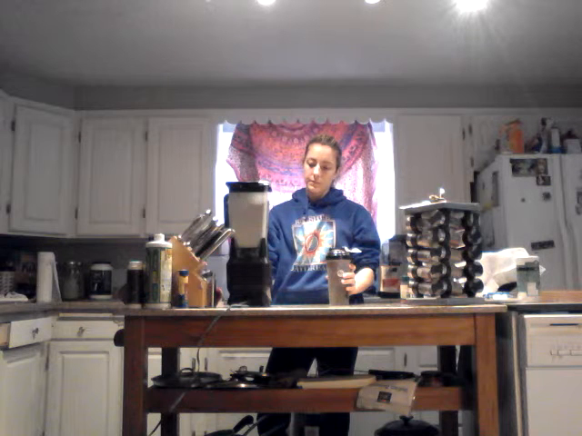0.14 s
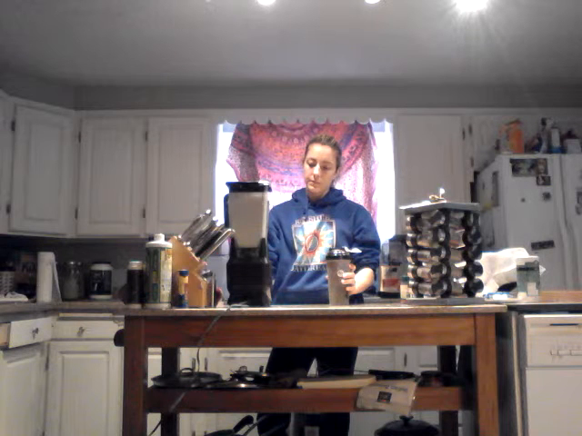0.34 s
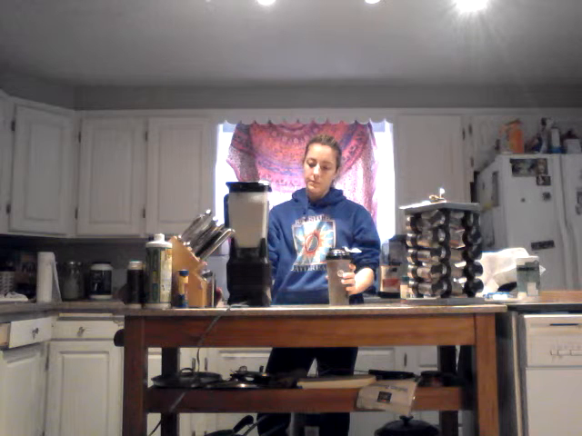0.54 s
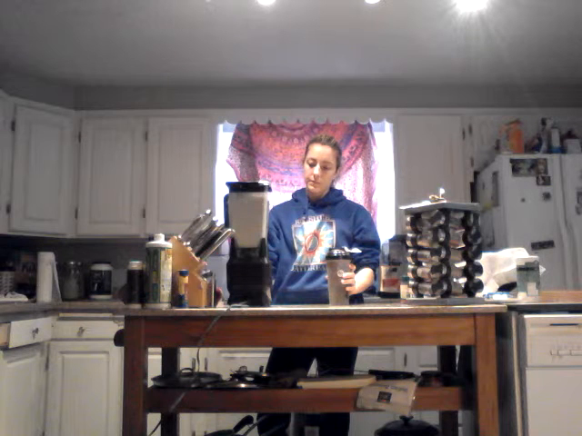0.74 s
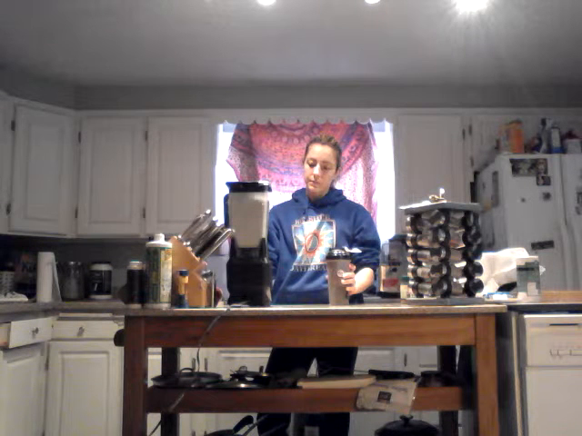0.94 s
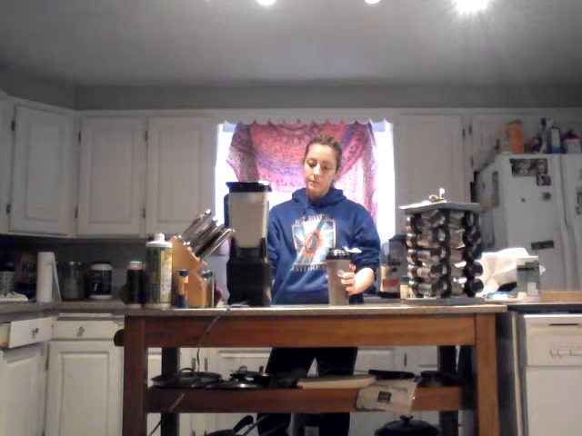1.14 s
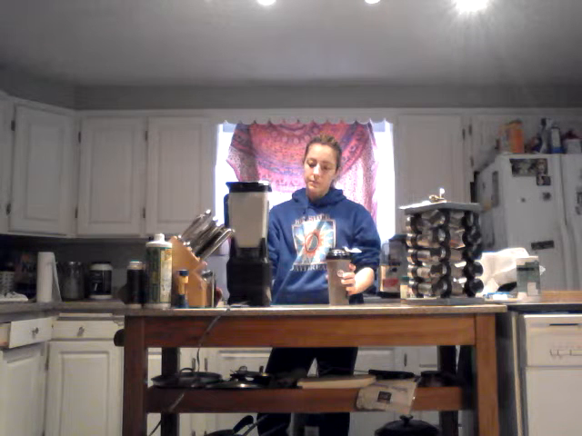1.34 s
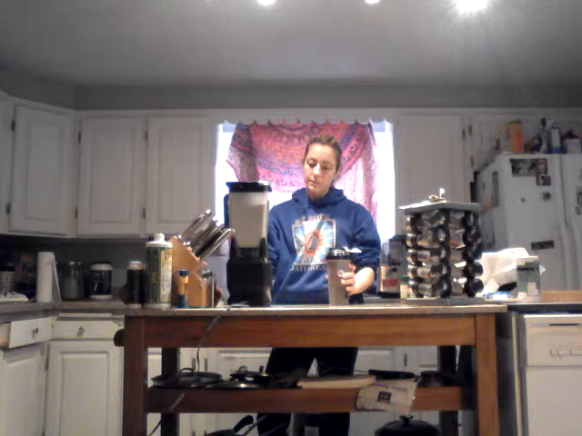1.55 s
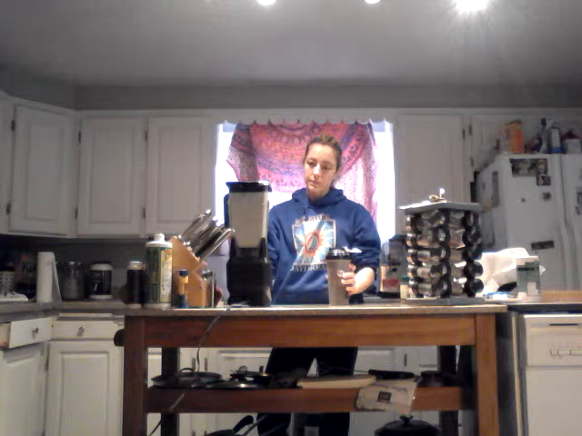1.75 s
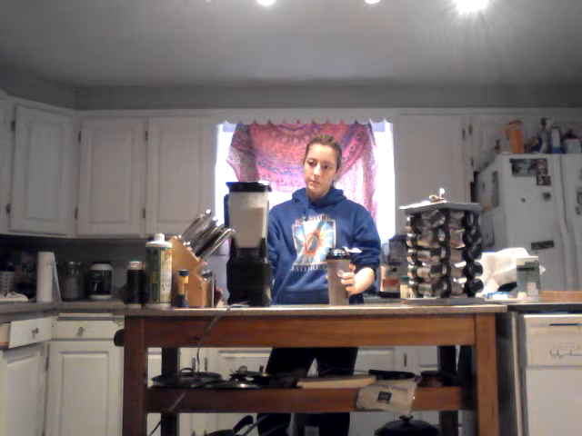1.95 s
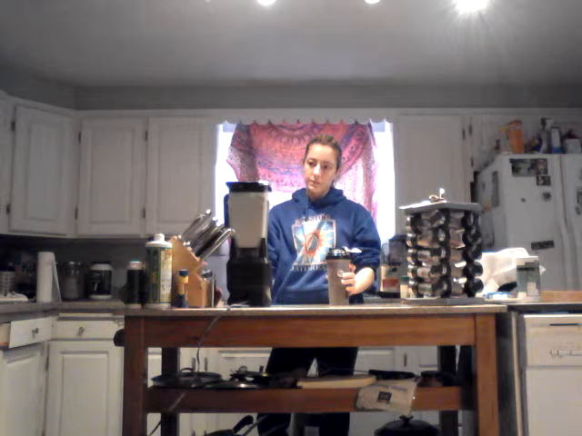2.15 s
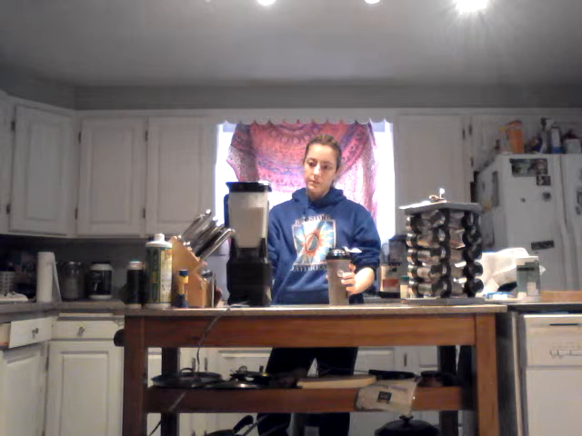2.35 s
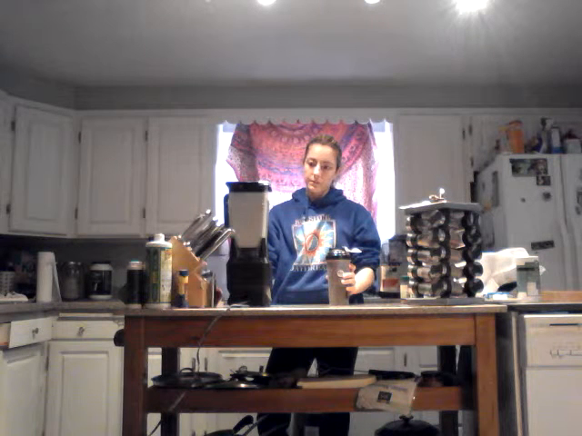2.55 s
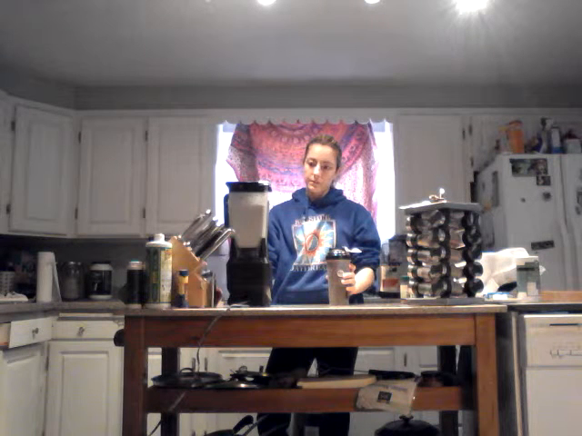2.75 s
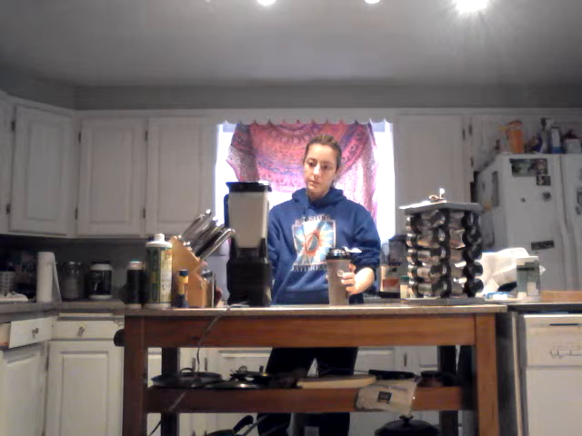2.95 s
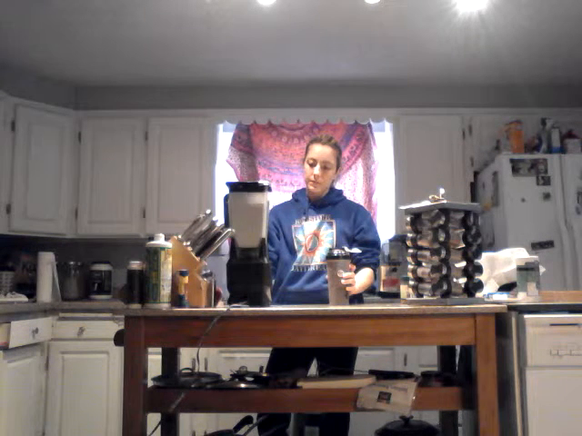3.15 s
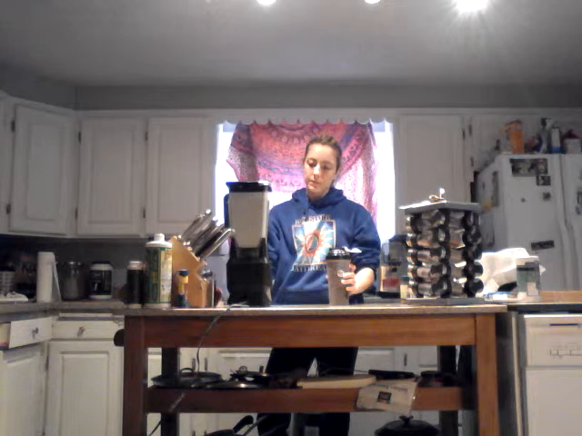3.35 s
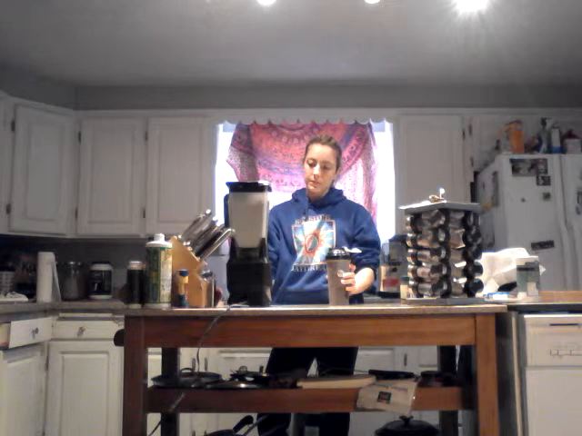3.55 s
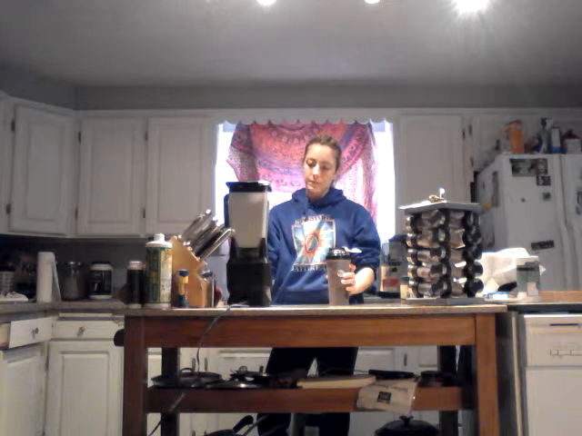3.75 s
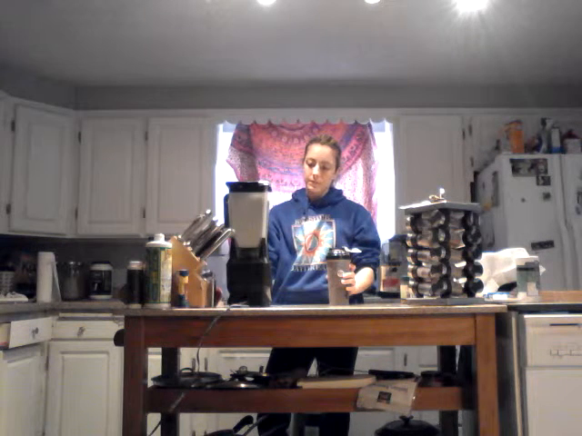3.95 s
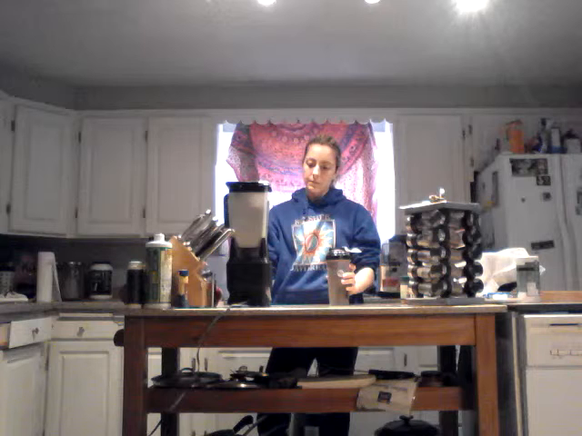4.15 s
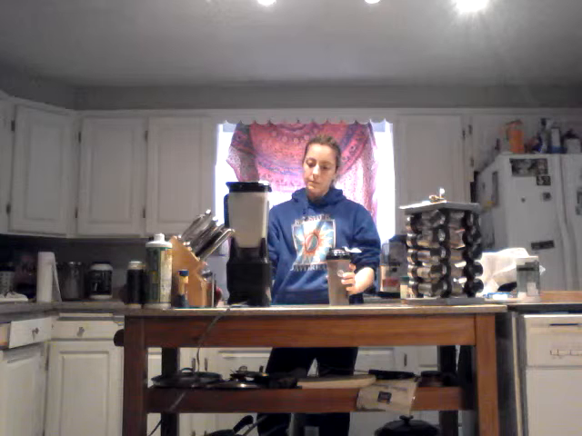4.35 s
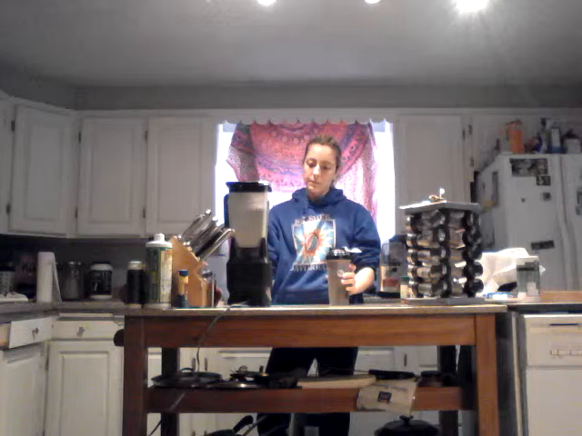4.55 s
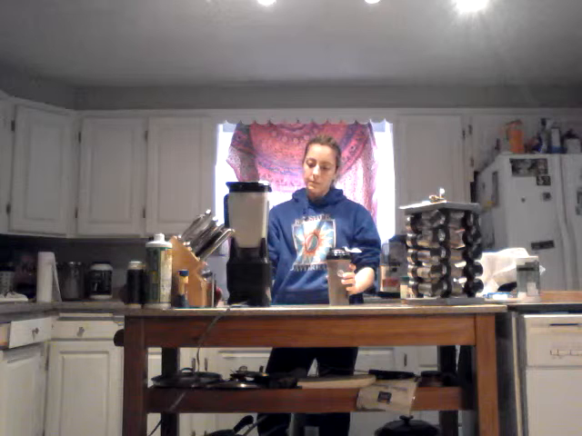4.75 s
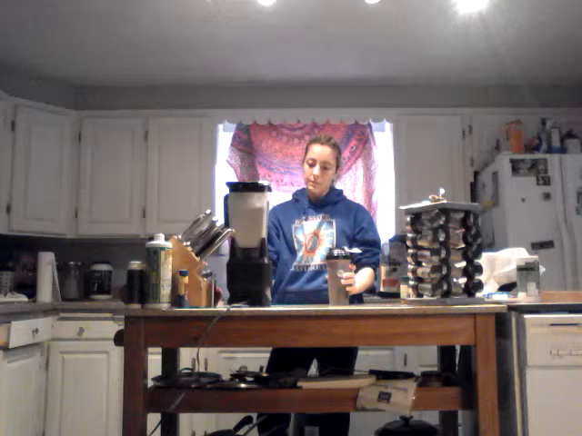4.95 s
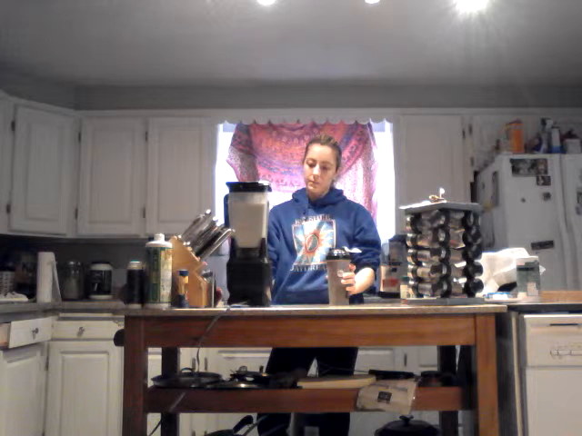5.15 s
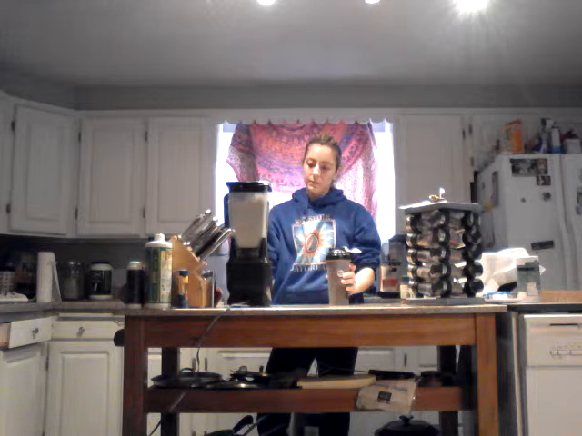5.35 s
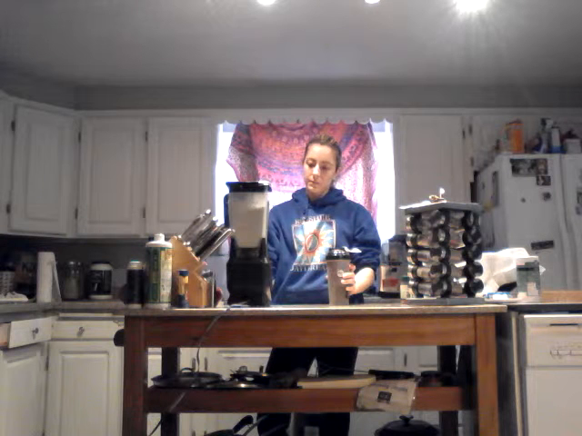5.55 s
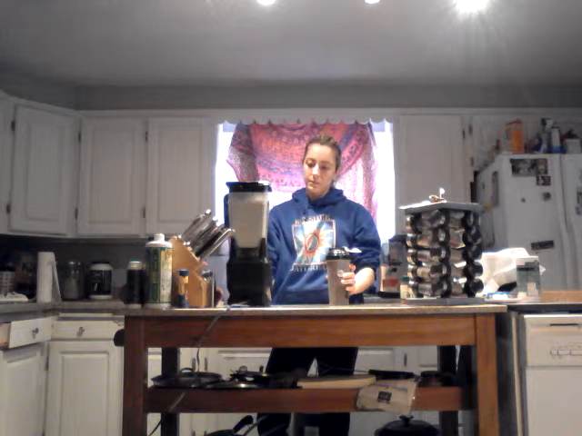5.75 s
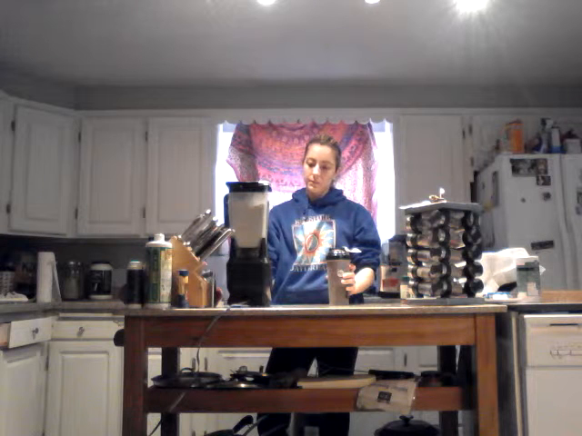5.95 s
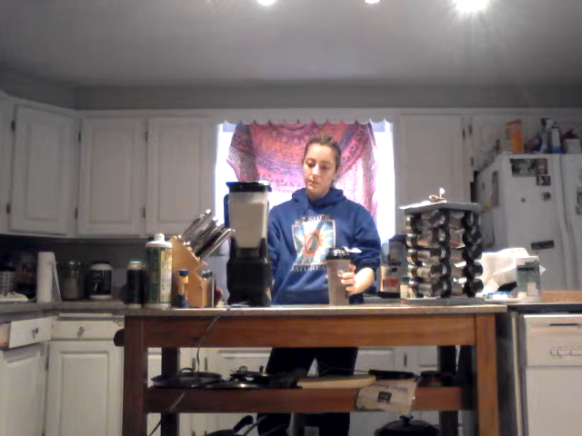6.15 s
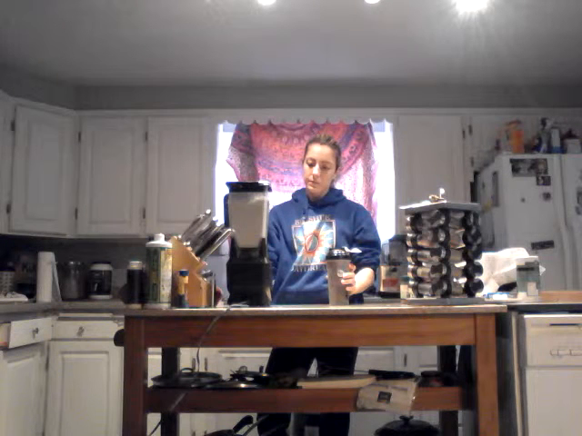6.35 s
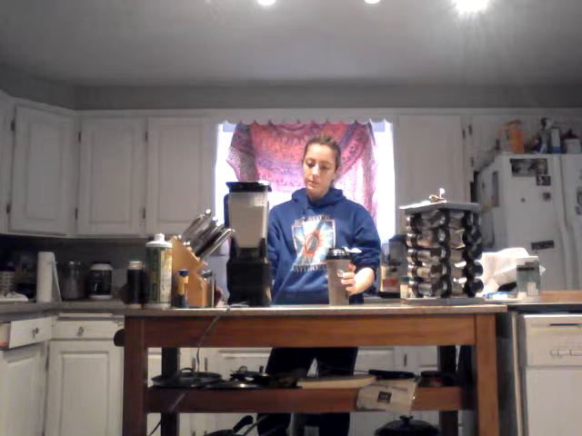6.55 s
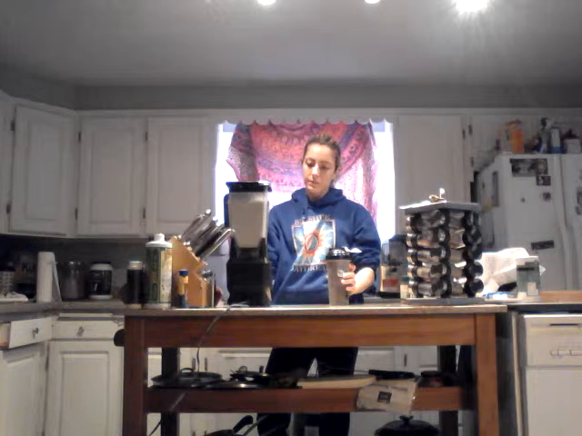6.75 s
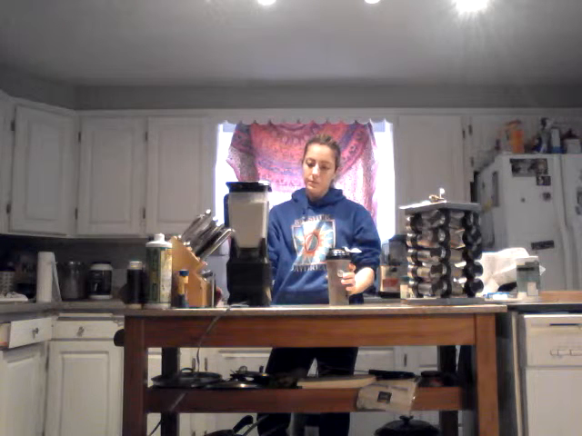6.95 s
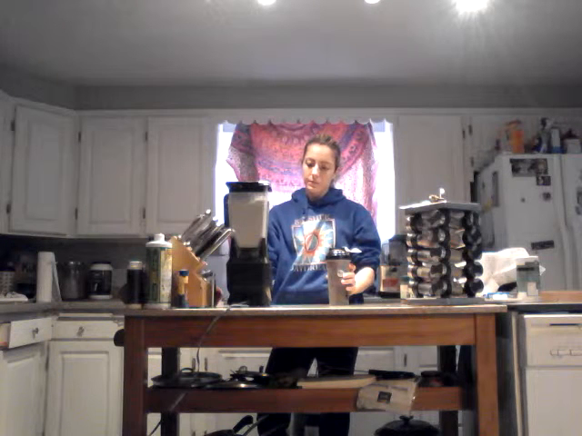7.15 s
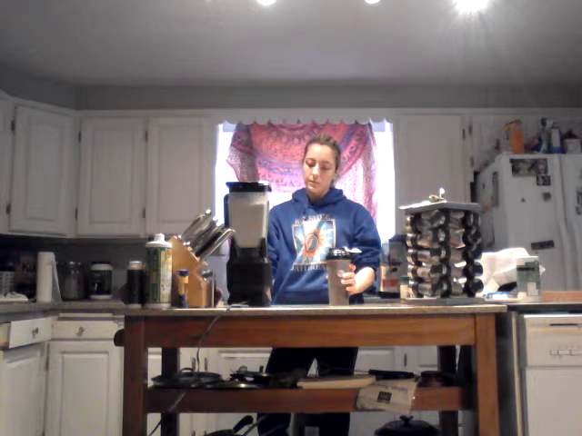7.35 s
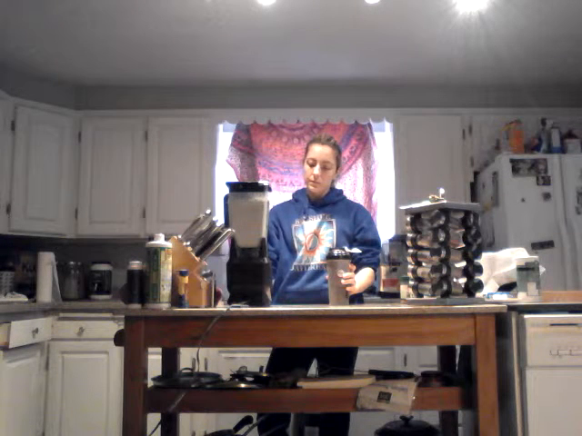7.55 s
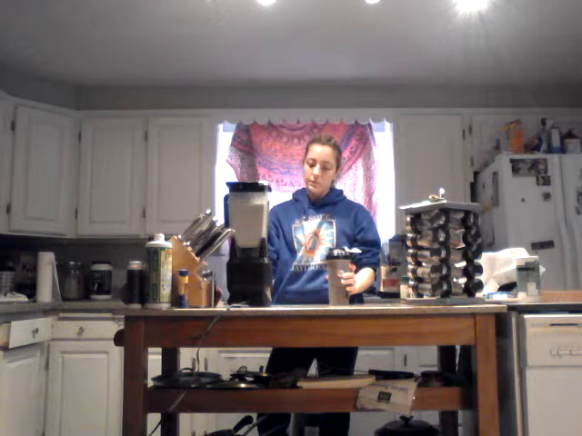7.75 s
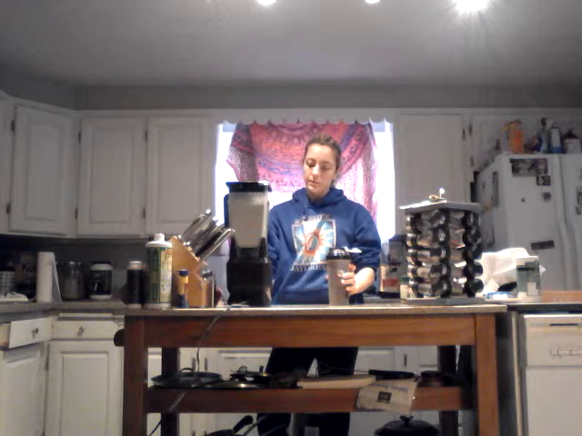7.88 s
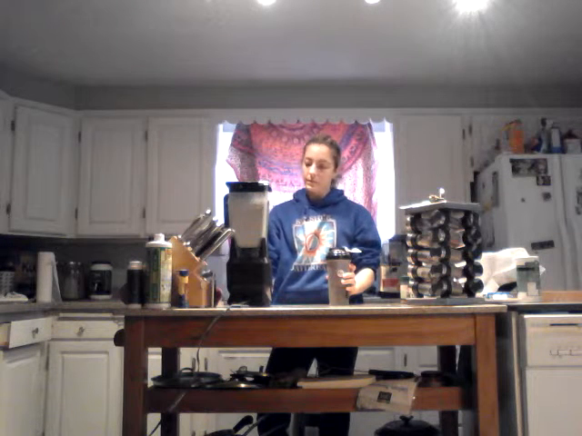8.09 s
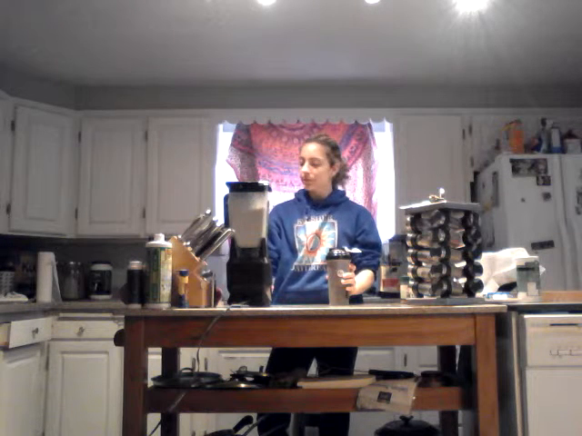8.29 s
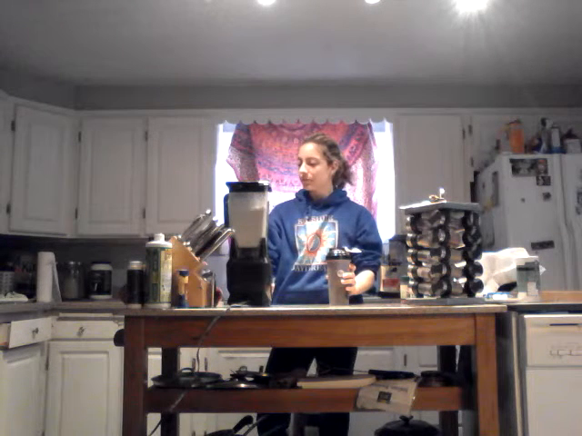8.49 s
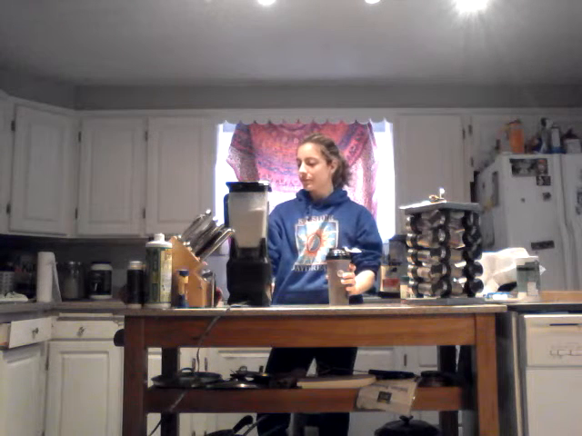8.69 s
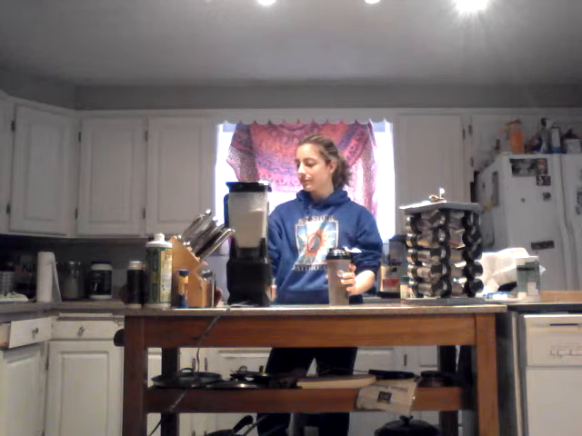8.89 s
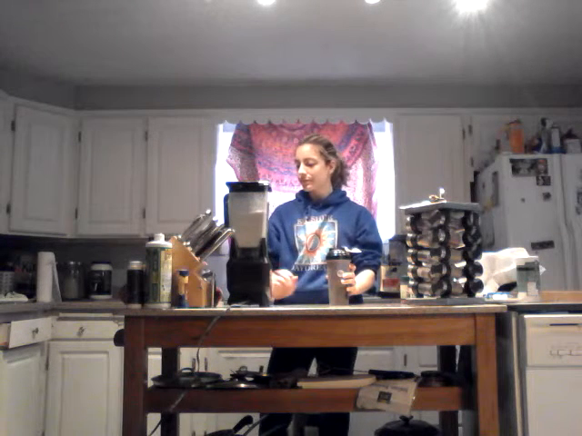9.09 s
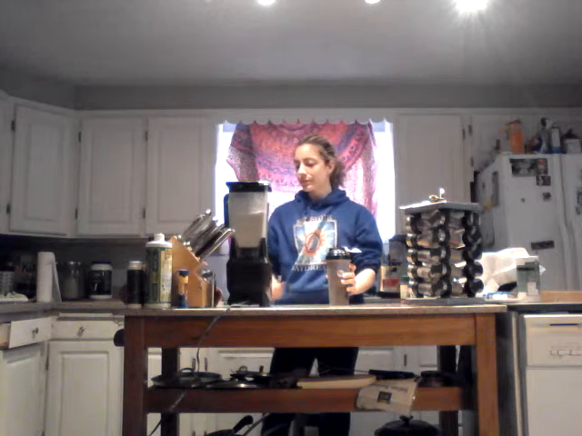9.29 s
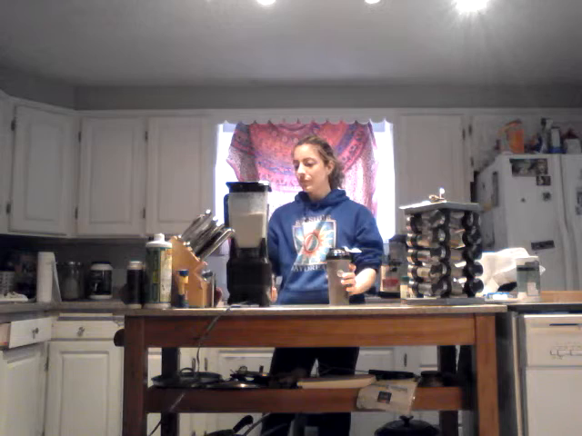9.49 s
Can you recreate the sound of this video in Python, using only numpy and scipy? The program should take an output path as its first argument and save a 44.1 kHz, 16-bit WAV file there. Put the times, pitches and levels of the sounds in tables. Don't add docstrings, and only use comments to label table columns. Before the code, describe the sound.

A kitchen blender roars and whines steadily, bogs down and surges in pitch under load, then switches off and coasts down to faint hiss.

```python
import sys
import numpy as np
from scipy import signal
from scipy.fft import rfft, irfft, next_fast_len
from scipy.io import wavfile
from scipy.ndimage import uniform_filter1d, map_coordinates

SR = 44100
rng = np.random.default_rng(int(sys.argv[2]) if len(sys.argv) > 2 else 0)


def gain_from_db(level_db):
    decades = np.asarray(level_db, float) / 20
    return 10 ** decades


def digitize_waveform(pressure):
    field = np.atleast_2d(pressure).T
    bounded = np.clip(field, -1, 1)
    quanta = np.round(bounded * 32767).astype(np.int16)
    wavfile.write(sys.argv[1], SR, quanta)


N = 426006
FRAME = 1024


def along(points, hz):
    f, db = np.transpose(points)
    return np.interp(np.log(hz + 1), np.log(f + 1), db)


def wobble(t, rate):
    knots = rng.standard_normal(int(t[-1] * rate) + 4)
    return map_coordinates(knots, [t * rate])


def hump(hz, centre_hz, spread):
    return np.exp(-0.5 * (np.log((hz + 1) / centre_hz) / spread) ** 2)


def unit(power):
    return power / power.sum(axis=0)


def ramp(t, start_s, rise_s):
    return np.clip((t - start_s) / rise_s, 0, 1)


# (unsteadiness [share of pitch], whine [dB], 2nd multiple [dB], 3rd multiple [dB],
# blade roar [dB], thrum [dB])
FREE = (0.054, -20, 6, -24, -1, -15)
LOADED = (0.07, 0, -0.5, -16, 0.05, -17)
STOPPED = (0.05, 11.5, -2, 0, -25, -16.5)
FREE_HZ, LOADED_HZ, LOAD_S, LOAD_RISE_S = 1914, 1800, 3.8, 0.15
BOG_END_S, BOG_HZ, BOG_SECOND_DB, BOG_THIRD_DB, BOG_JAR_DB = 4.45, -40, 2, 9, -5
HUNT_PEAK_S, HUNT_PERIOD_S, HUNT_HZ, HUNT_DB, HUNT_HISS_DB = 4.65, 0.475, 60, 8.5, -0.2
JAR_FREE_HZ, JAR_LOADED_HZ, JAR_RISE_S = 3640, 4160, 0.47
OFF_S, OFF_HZ, BRAKE_HZ_PER_S, EASE_HZ_PER_S2 = 7.85, 1750, 1050, 110
CUT_S, CUT_WHINE_DB, CUT_ROAR_DB, CUT_HISS_DB = 0.35, 4.5, -2, -0.4
SHUDDER, SHUDDER_S, SHUDDER_THIRD_DB = 0.12, 0.2, 5
HISS_DB, HISS_DB_PER_DECADE, THRUM_LINGERS_DB = -15, 29.5, 15


def motor(t):
    load = ramp(t, LOAD_S, LOAD_RISE_S)
    bog = load - ramp(t, BOG_END_S, LOAD_RISE_S)
    settle = ramp(t, OFF_S - HUNT_PERIOD_S, HUNT_PERIOD_S)
    swing = np.cos(2 * np.pi * (t - HUNT_PEAK_S) / HUNT_PERIOD_S)
    hunt = (load - bog) * (1 - settle) * swing
    powered_hz = FREE_HZ + load * (LOADED_HZ - FREE_HZ) + settle * (OFF_HZ - LOADED_HZ)
    powered_hz = powered_hz + HUNT_HZ * hunt + BOG_HZ * bog

    coast_s = np.clip(t - OFF_S, 0, None)
    lost_hz = BRAKE_HZ_PER_S * coast_s - EASE_HZ_PER_S2 * coast_s ** 2
    slowed = lost_hz / OFF_HZ
    state = np.outer(FREE, 1 - load) + np.outer(LOADED, load - slowed) + np.outer(STOPPED, slowed)
    loose, whine_db, second_db, third_db, roar_db, thrum_db = state

    shudder = np.exp(-0.5 * ((t - OFF_S) / SHUDDER_S) ** 2)
    cut = ramp(t, OFF_S - CUT_S / 2, CUT_S)
    loose = np.abs(loose) + SHUDDER * shudder
    whine_db = whine_db + CUT_WHINE_DB * cut + HUNT_DB * hunt
    second_db = second_db + BOG_SECOND_DB * bog
    third_db = third_db + SHUDDER_THIRD_DB * shudder + BOG_THIRD_DB * bog
    roar_db = roar_db + CUT_ROAR_DB * cut
    thrum_db = thrum_db + THRUM_LINGERS_DB * slowed ** 4
    hiss_db = HISS_DB + CUT_HISS_DB * cut + HUNT_HISS_DB * hunt + HISS_DB_PER_DECADE * np.log10(1 - slowed)
    jar_hz = JAR_FREE_HZ + ramp(t, LOAD_S, JAR_RISE_S) * (JAR_LOADED_HZ - JAR_FREE_HZ)
    multiples_db = (whine_db, second_db, third_db)
    return powered_hz - lost_hz, loose, multiples_db, jar_hz, BOG_JAR_DB * bog, hiss_db, roar_db, thrum_db


def commutator_whine(hz, t, whine_hz, loose, multiples_db):
    lines = 0
    for k, db in enumerate(multiples_db):
        bell = hump(hz, whine_hz * (k + 1), loose / np.sqrt(k + 1))
        lines = lines + gain_from_db(2 * (db + 1.2 * wobble(t, 18))) * bell
    return lines


# (frequency [Hz], level per Hz [dB])
BRUSH_COLOUR = [(250, -26), (700, -15), (1500, -13), (2250, -10), (3050, -11), (3500, -8), (4100, -6),
                (5000, -9), (6150, -15), (6450, -20), (7800, -22), (8800, -29), (11500, -33), (14600, -36)]


def brush_hiss(hz, whine_hz, jar_hz, jar_db, whine):
    tilt = 2.4 * np.clip(hz / 6000 - 1, 0, 2) + 20 * np.clip(hz / 10000 - 1, 0, 1)
    tilt = tilt - 1.47 * hump(hz, 1030, 0.54)
    speed = whine_hz / 1915
    colour = gain_from_db(2 * along(BRUSH_COLOUR, hz)) * speed ** tilt
    jar = gain_from_db(2 * (3.5 + jar_db)) * speed ** 0.8 * hump(hz, jar_hz, 0.082)
    return colour * (1 + jar + whine) / (colour * (1 + jar)).sum(axis=0)


def blade_roar(hz, whine_hz):
    return unit(hump(hz, 700 + 0.95 * whine_hz, 0.14))


# (frequency [Hz], level per Hz [dB])
BODY_THRUM = [(20, -25), (100, -22), (150, -30), (210, 4), (500, 4.5), (800, -18), (1500, -18)]


def low_thrum(hz):
    return unit(gain_from_db(2 * along(BODY_THRUM, hz)))


def blender():
    hz, t, noise = signal.stft(rng.standard_normal(N), SR, nperseg=FRAME, noverlap=FRAME * 3 // 4)
    hz = hz[:, None]
    whine_hz, loose, multiples_db, jar_hz, jar_db, hiss_db, roar_db, thrum_db = motor(t)
    whine_hz = whine_hz * (1 + 0.003 * wobble(t, 12))

    whine = commutator_whine(hz, t, whine_hz, loose, multiples_db)
    hiss_gain = gain_from_db(1.23 * (-0.68 + 0.29 * wobble(t, 12)))
    roar_gain = gain_from_db(2.56 * (roar_db - 1.85 + 0.45 * wobble(t, 9)))
    thrum_gain = gain_from_db(2.4 * (thrum_db - 5.0 + 0.24 * wobble(t, 8.7)))
    power = hiss_gain * brush_hiss(hz, whine_hz, jar_hz, jar_db, whine)
    power = power + roar_gain * blade_roar(hz, whine_hz) + thrum_gain * low_thrum(hz)

    slosh_db = 0.5 * wobble(t, 12) + 0.6 * wobble(t, 24)
    field = uniform_filter1d(rng.standard_normal(noise.shape), size=14, axis=0)
    field = uniform_filter1d(field, size=7, axis=1)
    patches_db = 0.6 * field / field.std()
    gain = np.sqrt(power * len(hz)) * gain_from_db(hiss_db + slosh_db + patches_db)
    return signal.istft(noise * gain, SR, nperseg=FRAME, noverlap=FRAME * 3 // 4)[1][:N]


# (frequency [Hz], width [Hz], level
# [dB])
FIXED_MODES = [(197, 20, 2.0), (241, 30, 3.3), (290, 34, 10), (381, 34, -4.2), (473, 36, 13.5),
               (512, 26, 7.5), (562, 23, -2.7), (601, 23, 2.5), (689, 23, 5.5), (802, 21, -2.6),
               (864, 20, -3.9), (970, 37, -4.6), (1007, 160, 3.1), (1105, 103, -4.7), (1203, 36, -4.6),
               (1619, 45, -4.3),
               (1755, 44, 3.0), (1805, 50, -6.4), (1913, 48, 2.2), (2050, 45, -3.0), (2139, 85, -11.9),
                 (2163, 126, 8.1), (2256, 23, -3.3), (2411, 132, 9.6), (2467, 119, -11.9), (2644, 153, 3.6),
                 (2699, 30, -4.5), (2750, 52, 4.8), (2935, 21, 3.2), (3053, 88, -3.8), (3380, 29, -2.6),
                 (3482, 20, -3.5), (3834, 38, 3), (3913, 20, 4.8), (4121, 35, -2.9), (4268, 21, 3.8),
                 (4420, 42, 6.9), (5237, 20, 5.1), (5316, 36, 7.5), (5486, 26, 4.5), (5807, 90, 4.1),
                 (6259, 37, 3.9), (8022, 48, -4.5), (8724, 160, -4.8), (8956, 70, 3.5), (9090, 33, -6.3)]
# (frequency [Hz], width [Hz], level [dB])
MICROPHONE_PORT = [
    (10600, 900, 2.5),
    (14150, 150, 5),
]


def kitchen(x):
    size = next_fast_len(N + SR)
    hz = np.fft.rfftfreq(size, 1 / SR)
    modes_db = 0
    for centre_hz, width_hz, db in FIXED_MODES + MICROPHONE_PORT:
        modes_db = modes_db + db / (1 + (2 * (hz - centre_hz) / width_hz) ** 2)
    t = np.arange(SR // 4) / SR
    tail = rng.standard_normal(len(t)) * gain_from_db(-60 * t / 0.35)
    room = 1 + gain_from_db(-17) * rfft(tail / np.linalg.norm(tail), size)
    return irfft(rfft(x, size) * gain_from_db(modes_db) * room, size)[:N]


def microphone_hiss():
    return gain_from_db(-60) * signal.lfilter([1], [1, -0.5], rng.standard_normal(N))


def scene():
    sound = kitchen(blender()) + microphone_hiss()
    return np.array([sound, sound])


def top_cut(x):
    return signal.sosfilt(signal.butter(12, 14900, fs=SR, output="sos"), x)


def record(dry):
    rounded = dry[0] / (1 + np.abs(dry[0] / 0.97) ** 5) ** (1 / 5)
    bass_cut = signal.butter(9, 178, "high", fs=SR, output="sos")
    cut = signal.sosfilt(bass_cut, rounded)
    thud_band = signal.butter(1, [40, 110], "band", fs=SR, output="sos")
    rumble = gain_from_db(-34.5) * signal.sosfilt(thud_band, np.abs(rounded) ** 3)
    mix = cut + rumble
    return top_cut(np.array([mix, mix]))


dry = scene()
out = record(dry)
digitize_waveform(out)
```